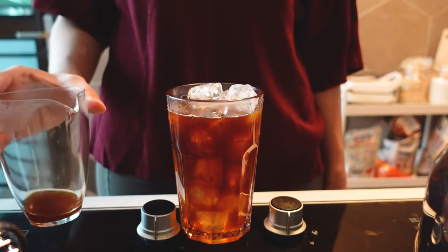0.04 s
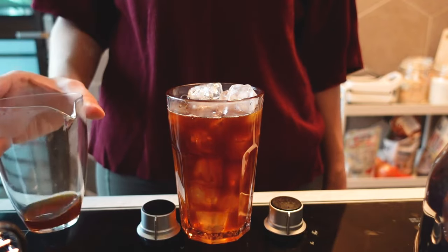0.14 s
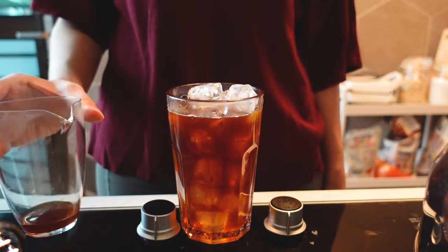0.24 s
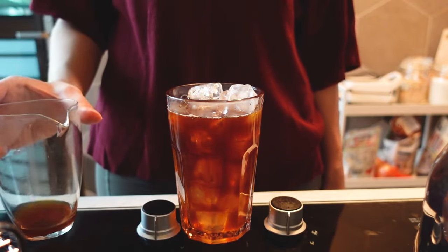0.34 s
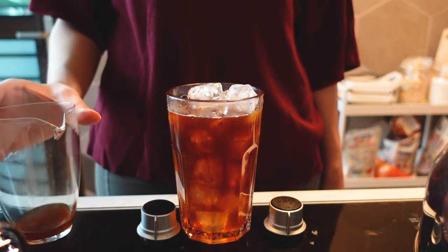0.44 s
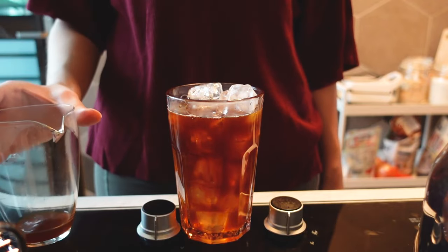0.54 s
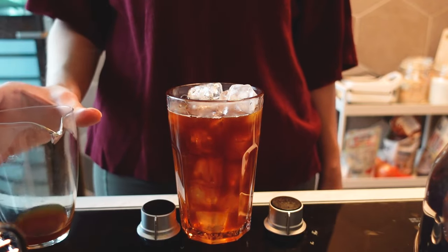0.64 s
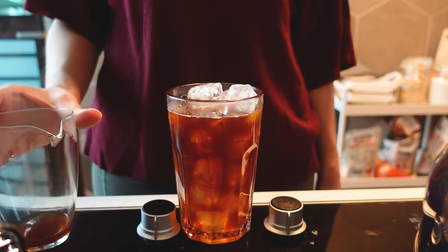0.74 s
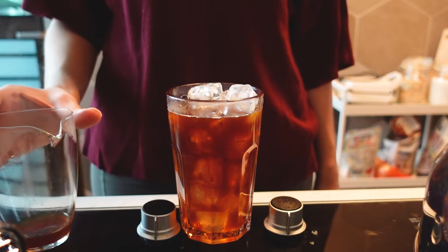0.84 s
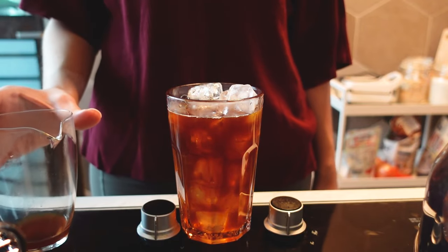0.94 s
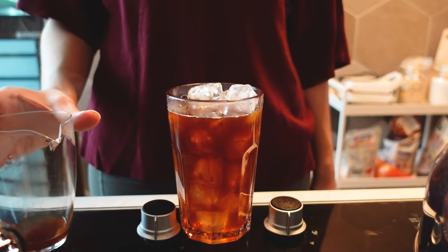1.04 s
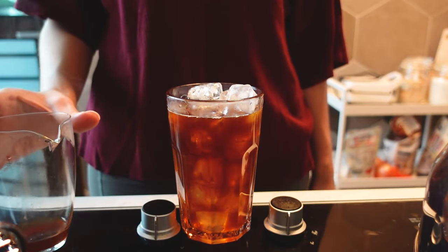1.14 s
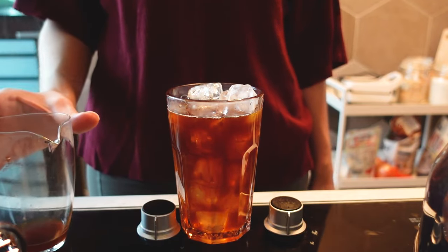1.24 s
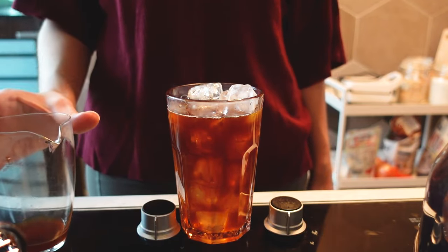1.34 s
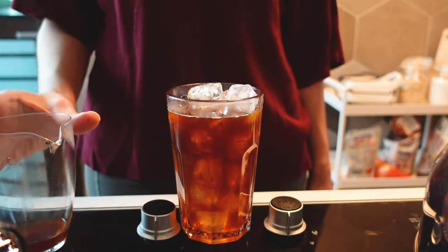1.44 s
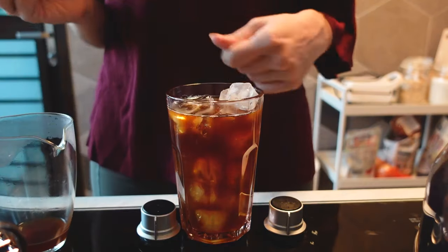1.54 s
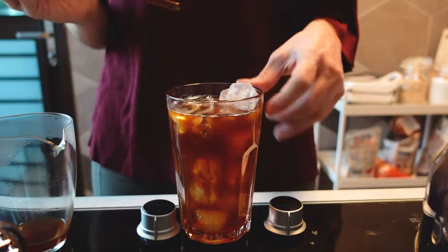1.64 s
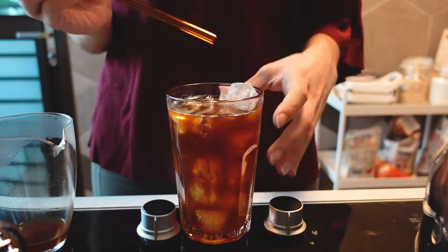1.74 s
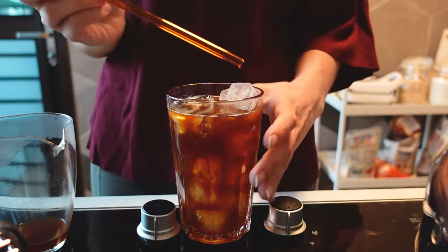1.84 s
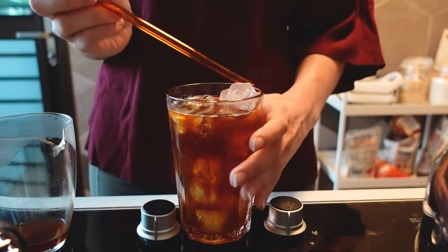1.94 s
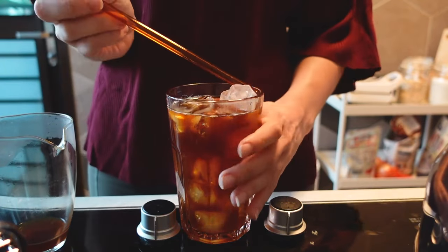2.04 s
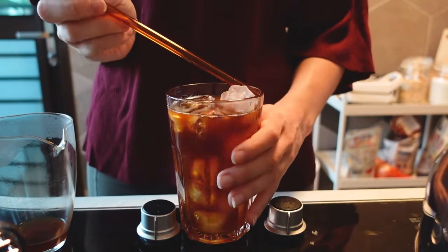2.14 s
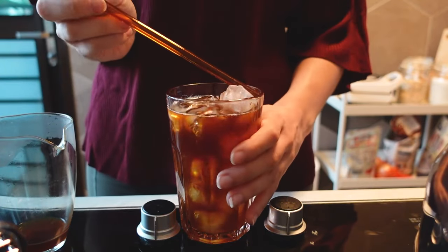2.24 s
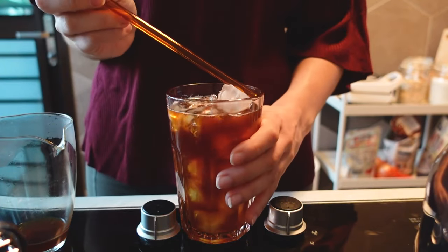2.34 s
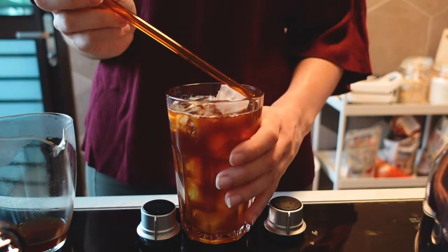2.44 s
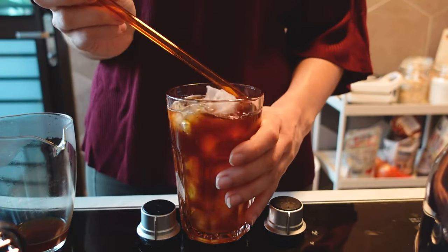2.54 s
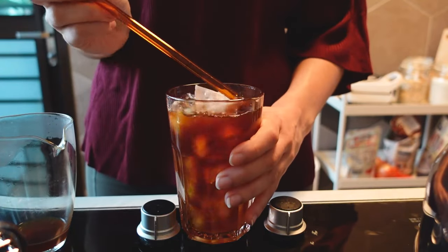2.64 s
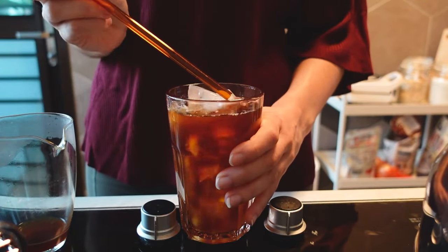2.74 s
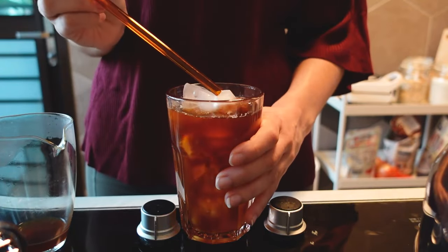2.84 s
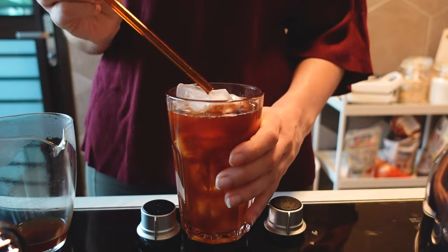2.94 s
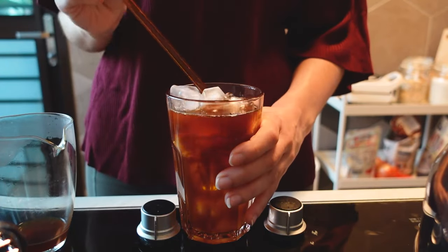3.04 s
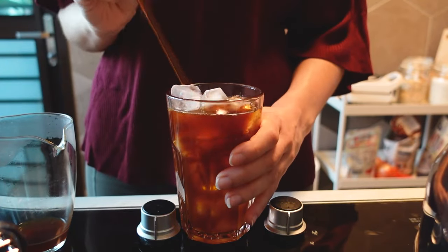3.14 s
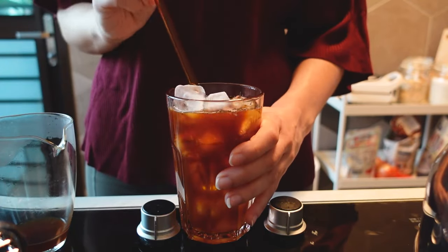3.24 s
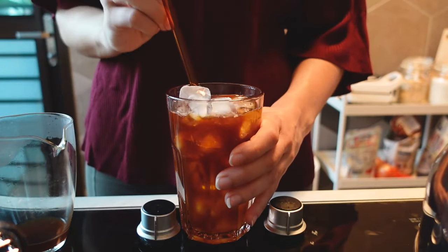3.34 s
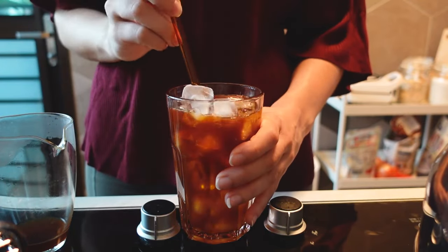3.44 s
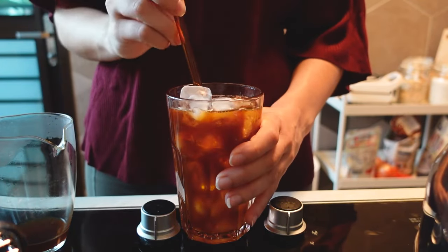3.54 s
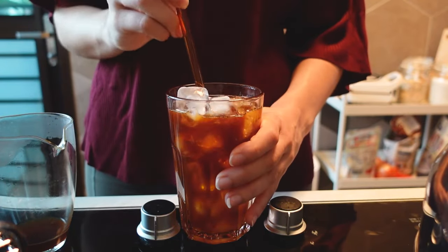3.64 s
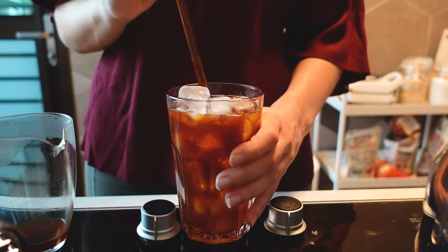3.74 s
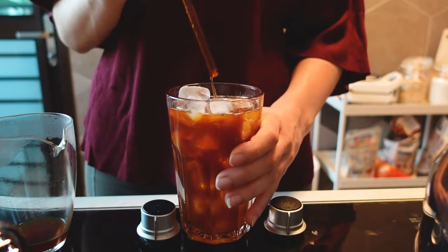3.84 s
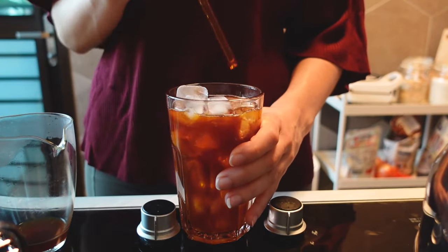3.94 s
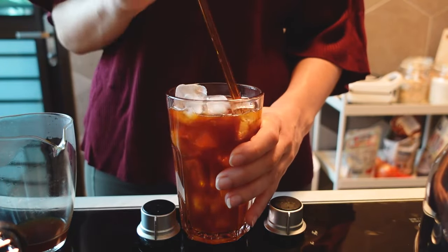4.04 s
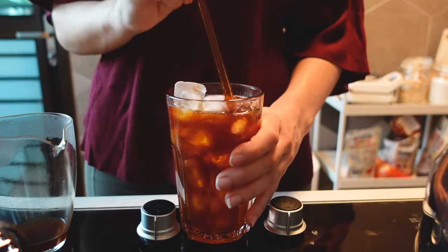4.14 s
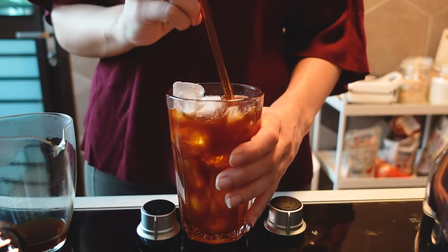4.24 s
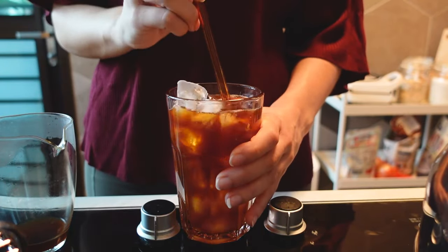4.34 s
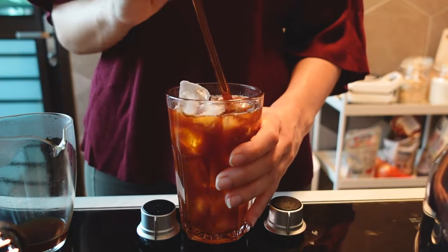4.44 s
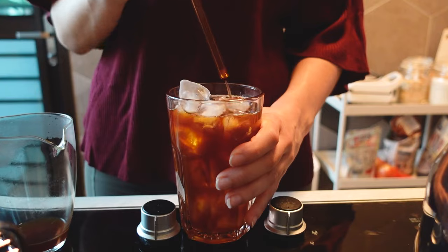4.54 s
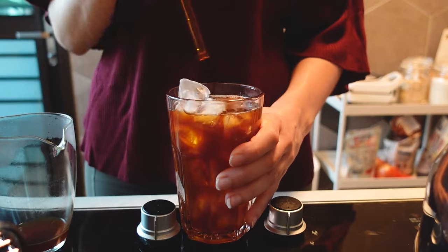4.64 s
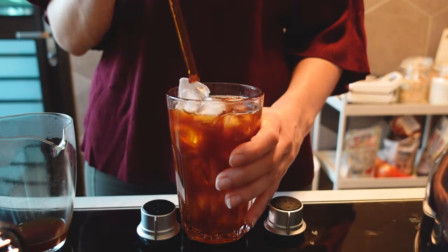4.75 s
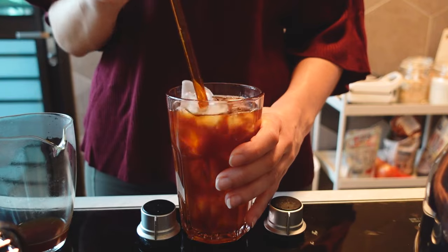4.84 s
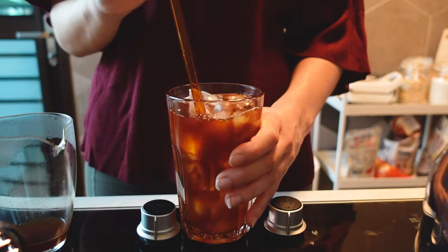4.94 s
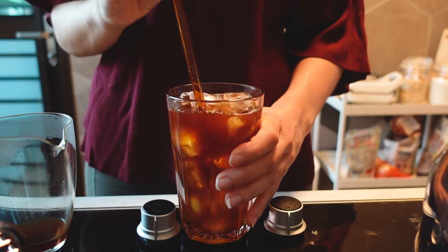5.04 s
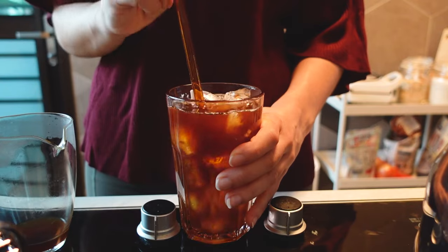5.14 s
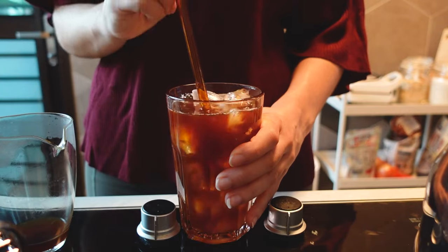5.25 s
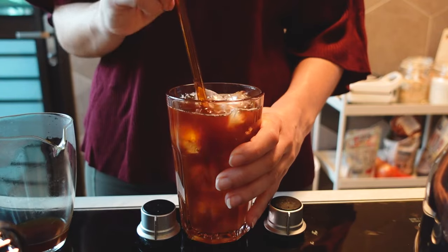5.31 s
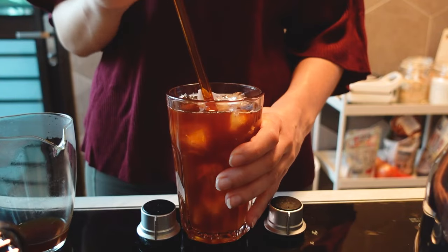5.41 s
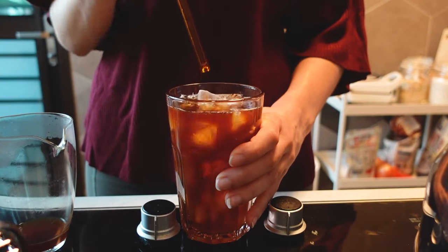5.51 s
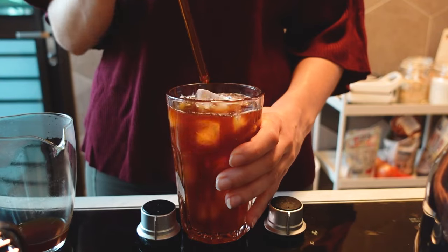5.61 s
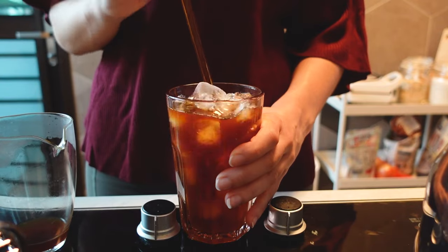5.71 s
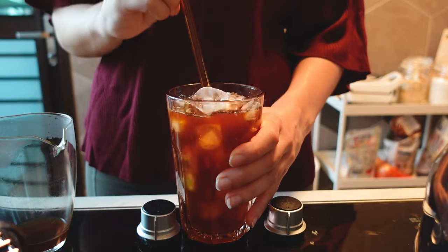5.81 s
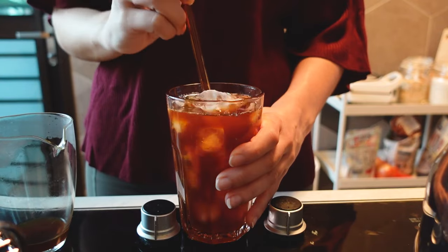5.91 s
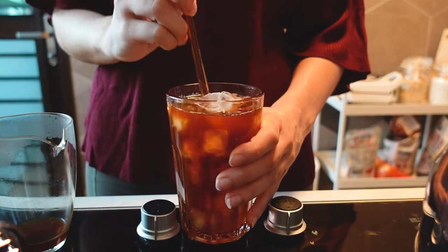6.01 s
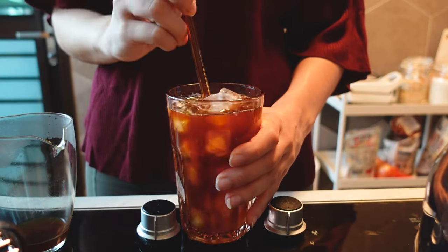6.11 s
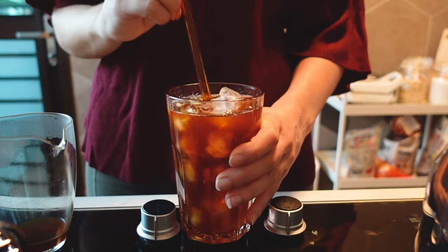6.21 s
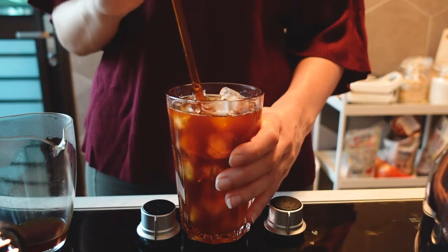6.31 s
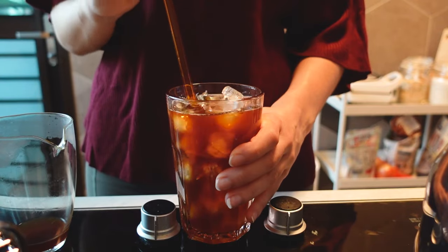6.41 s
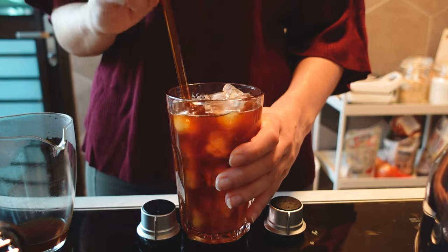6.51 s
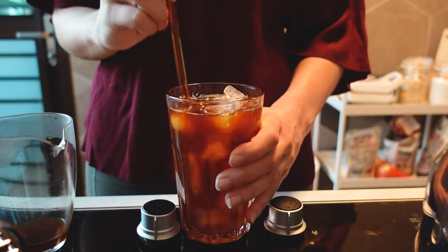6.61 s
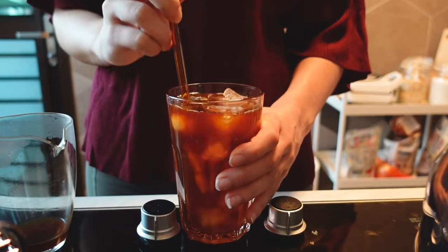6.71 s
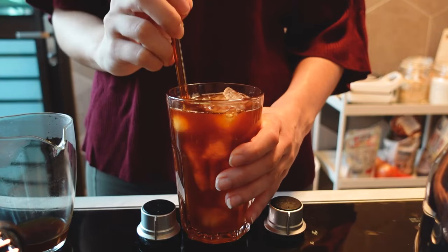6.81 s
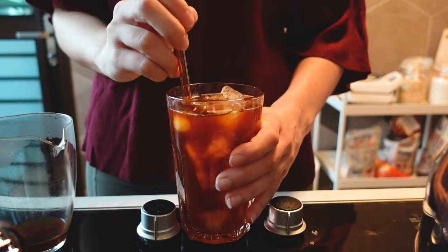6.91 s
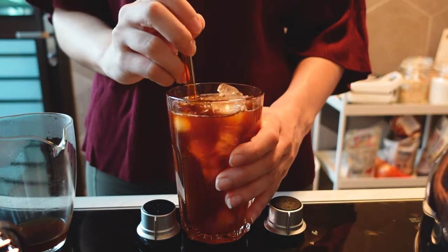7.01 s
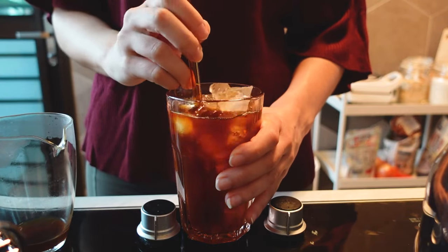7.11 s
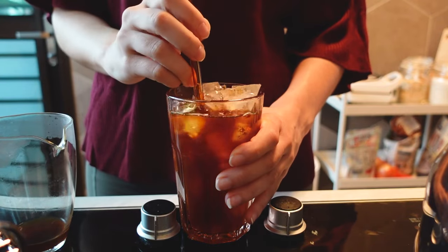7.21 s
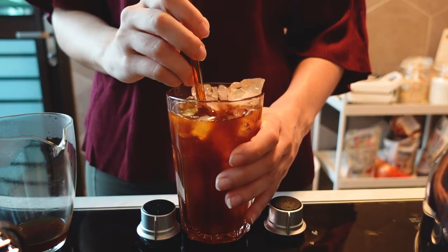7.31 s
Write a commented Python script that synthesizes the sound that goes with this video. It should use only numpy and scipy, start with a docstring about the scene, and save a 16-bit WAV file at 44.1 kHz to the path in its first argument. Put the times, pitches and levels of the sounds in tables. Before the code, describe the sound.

Ice cubes clink, bump and scrape in a tall glass as a straw stirs the drink, after a tumbler knocks on a kitchen counter.

```python
"""Faint swishes and soft bumps, then a tumbler is set down, close to the microphones in a small kitchen.
Then a glass straw stirs an iced drink stroke by stroke: ice cubes clink, grind and bump in a tall glass.
Bursts of noise ring the filled glass, random tiny slips make it grind and sing, and bending tones gulp.
Shaped noise crackles behind the knocks; the kitchen adds reflections over steady low hum and hiss."""
import sys
import numpy as np
from scipy import signal
from scipy.fft import rfft, irfft, next_fast_len
from scipy.io import wavfile

SR = 44100
rng = np.random.default_rng(int(sys.argv[2]) if len(sys.argv) > 2 else 0)


def unload_audio(sound):
    """Save the sound as a 16-bit wav file, at the path given as the first command line argument."""
    columns = np.transpose(np.atleast_2d(sound))
    # keep every value between -1 and 1, then stretch to whole-number steps
    steps = np.round(np.clip(columns, -1, 1) * 32767)
    wavfile.write(sys.argv[1], SR, steps.astype(np.int16))


N = 325017

# clear knocks of ice and straw on each other and the glass, as driven into the glass:
# [t/s, level/dB, ring f/Hz, thud re level/dB, crack re level/dB]; thud and crack before a common trim
CLINKS = [(2.0253, -33.5, 9020, -1.5, 7), (2.0272, -35.5, 5900, -12, -3), (2.107, -47.5, 3960, -4, -1),
          (2.1181, -47, 2410, -1, -4), (2.154, -47, 2360, 17.5, -10), (2.1934, -30.5, 3570, -31, -7.5),
          (2.3406, -47.5, 3940, -4, -12), (2.379, -41, 2000, -7, -31), (2.4082, -43, 2186, -0.5, -9),
          (2.4398, -45.5, 2420, 3, -18), (2.4867, -47, 3970, -5, -7.5), (2.585, -53, 3875, -8, -13),
          (2.6046, -51, 3860, -4, -13), (2.616, -34.5, 3700, -10, -3.5), (2.6402, -31.5, 3880, -8, -20),
          (2.6677, -38.5, 7000, -6, -6), (2.7045, -37, 7000, -7, -14), (2.7455, -42, 3700, -19, -0.5),
          (2.9978, -46, 4080, 5, -5), (3.154, -47.5, 5670, -2, 1.5), (3.173, -39.5, 3850, -2, -12),
          (3.1918, -38, 2900, -1.5, -22), (3.225, -40.5, 4950, 1, 3), (3.277, -39.5, 3780, -9, -36),
          (3.319, -33.5, 5500, -19, -34), (3.331, -43, 3854, -22, -13), (3.3506, -35, 3850, -21, -1.5),
          (3.369, -23.5, 2840, -1, -28), (3.398, -27, 3630, -2, -13), (3.4526, -35.5, 5980, 2.5, -18),
          (3.5018, -26.5, 1680, 1, -27), (3.577, -40.5, 2440, 10.5, -8.5), (3.705, -50, 4030, 10.5, -2.5),
          (3.808, -40, 3800, 0, 4), (3.8173, -31.5, 3870, -10, -20), (3.9117, -39.5, 2100, 6, -10),
          (4.03, -59, 3660, -8, -12), (4.1337, -28.5, 2500, -3, -27), (4.1391, -30, 3800, -9, -16),
          (4.169, -31, 4200, -18, -18), (4.1922, -23.5, 3850, -7.5, -8), (4.239, -32, 1620, -1, -14),
          (4.2543, -26, 3900, -6, -6.5), (4.2704, -31, 3830, -4, -9), (4.2871, -24, 2840, -3, -18),
          (4.2923, -31.5, 2800, 1, -6), (4.3219, -25, 4220, -4.5, -1), (4.3452, -28, 3800, -0.5, -8),
          (4.3632, -28, 3150, 0.5, -11), (4.38, -29.5, 3920, -6, -12), (4.391, -24, 2200, 1.5, -17),
          (4.454, -38, 2670, 2.5, -2.5), (4.4716, -24.5, 2650, -8.5, -37), (4.4959, -33.5, 2730, 3, -2.5),
          (4.539, -29.5, 2790, -13, -38), (4.779, -49.5, 1620, 3.5, -15), (4.8525, -31, 2670, -5, -12),
          (4.8628, -38.5, 2710, 1, -3), (4.901, -25, 2740, 1, -11), (4.9051, -30, 2710, 0, -6),
          (4.9148, -29.5, 3870, -3, -13), (4.996, -31.5, 4400, -7, -6), (5.0298, -33.5, 4070, -17, -2),
          (5.037, -36.5, 8120, -12, 5.5), (5.054, -31.5, 3800, -8, -8), (5.0952, -28, 2800, -5.5, -1.5),
          (5.1171, -40, 5500, 0, -2), (5.1485, -35.5, 5500, -2, -16), (5.1641, -35, 3850, -8, -12),
          (5.168, -45.5, 11500, -3, 5), (5.1852, -32.5, 3650, -5, -11), (5.212, -23.5, 2140, 0.5, -22),
          (5.2297, -33, 2210, 3, -14), (5.257, -23, 2710, -3.5, -22), (5.292, -38, 2800, -4, -18),
          (5.3095, -29, 2070, 6, -28), (5.3258, -25, 2000, -5, -28), (5.349, -31.5, 2840, -18, -21),
          (5.391, -35, 2790, -14, -13), (5.406, -38.5, 2734, -10, -8), (5.4471, -43.5, 3520, 0, -17),
          (5.5034, -36.5, 2000, -17, -22), (5.601, -47, 6250, -7, -12), (5.62, -50, 1480, -12, -20),
          (5.645, -46.5, 2130, -6, -18), (5.6629, -50, 3740, -5, -16), (5.7423, -28.5, 5600, -2.5, -7),
          (5.7539, -26, 3900, -1.5, -4), (5.769, -31, 2300, -15, -16), (5.7925, -24, 3670, -8, -6),
          (5.8114, -24.5, 3830, -3, -14), (5.8149, -25, 3160, -7, -14), (5.8191, -24.5, 3750, -11, 1.5),
          (5.8342, -21, 4020, -1, -20), (5.8408, -24.5, 3850, -6, -16), (5.8612, -19.5, 2140, -18, -16),
          (5.876, -27, 3780, -4.5, -0.5), (5.9321, -31, 3030, -7, -25), (5.9764, -29, 3250, 4.5, -27),
          (5.991, -33, 7860, 5, -5.5), (6.034, -29, 2300, -2, -16), (6.071, -36, 2520, -4, -23),
          (6.0875, -26, 2460, -10, -40), (6.1092, -40, 4500, -9, -21), (6.126, -37, 2433, -15, -25),
          (6.1636, -38.5, 2300, -2.5, -27), (6.2158, -29, 2263, -12.5, -39), (6.2323, -23, 2430, -16, -12),
          (6.33, -38, 3930, -13, -14), (6.3764, -39.5, 2110, -7, -23), (6.4213, -37.5, 5256, -13, -9),
          (6.4373, -34, 3900, -19, -12), (6.448, -27.5, 3870, -26, -24), (6.4666, -31, 3850, -25, -24),
          (6.5113, -27, 2400, 3.5, -3.5), (6.5284, -15, 2380, -7, -11), (6.5432, -24.5, 2330, -4, 0.5),
          (6.5779, -29.5, 8940, -1.5, 3), (6.597, -31.5, 2480, -9, -22), (6.647, -34, 3060, -24, -31),
          (6.672, -37.5, 8130, -5, 2.5), (6.6943, -34, 2400, -10, -11), (6.7183, -21, 2410, -2, -32),
          (6.7456, -25, 2400, -8.5, -33), (6.7882, -35, 5160, -4, -14), (6.8129, -36, 1507, 0, -10),
          (6.8252, -32.5, 2540, 4.5, 0.5), (6.85, -40, 1550, -5, -18), (6.8598, -30.5, 2520, -7, -22),
          (6.908, -54.5, 7900, -8, 7.5), (6.922, -40, 2500, -8, -19), (6.94, -36, 2600, -7, -20),
          (6.9451, -29.5, 2550, -8.5, -30), (6.957, -39.5, 5360, -10, -18),
          (7.0226, -33.5, 2530, -4.5, -29), (7.05, -41, 3080, -8, -20), (7.074, -43.5, 4700, -12, -16),
          (7.087, -36, 2520, -11, -20), (7.0957, -29.5, 4570, -14, -18), (7.1271, -36, 4260, -10, -16),
          (7.154, -36.5, 2490, -10, -25), (7.185, -42, 3780, -9, 1), (7.1981, -30.5, 2530, -14, -40),
          (7.2134, -30.5, 3310, -10, -41), (7.233, -38, 4500, -8, -22), (7.2513, -30.5, 2440, -29, -34),
          (7.295, -51, 7050, -15, 7), (7.3382, -39.5, 3220, -10, -17), (7.3678, -28.5, 3900, -24, -21)]
# pushes of the straw through the ice, before the trim of each layer:
# [start t/s, hold/s, effort level/dB, then re effort/dB: singing wall, scraping, churning]
STROKES = [(2.082, 0.16, -51, -8, -6, 9.5), (2.34, 0.3, -62.5, 4.5, -6, 11.5),
           (2.614, 0.051, -43, 10.5, 5, 11), (2.91, 0.19, -59, -2.5, -12, 10),
           (3.069, 0.39, -53.5, 3.5, 6.5, 0), (3.366, 0.054, -34.5, -9, -17, -0.5),
           (3.494, 0.098, -42.5, -9.5, -16, 4.5), (3.783, 0.16, -45.5, -8.5, -2.5, -2.5),
           (4.132, 0.0098, -32, -0.5, 3.5, 1), (4.259, 0.15, -31.5, -7.5, -10, -10),
           (4.47, 0.11, -46, -4, 8, -4), (4.896, 0.08, -34.5, -1.5, -4, -2.5),
           (5.016, 0.098, -33.5, 1.5, 6, -6.5), (5.207, 0.12, -34.5, -10.5, -8, -6.5),
           (5.437, 0.36, -53, -9, -7.5, -2), (5.74, 0.15, -36, 3, 7.5, 4),
           (5.967, 0.12, -31.5, -14, -4.5, -8.5), (6.221, 0.1, -42, -4.5, -2, -3),
           (6.427, 0.05, -36.5, -2, -12, -1.5), (6.507, 0.041, -27, -9, 0.5, -4.5),
           (6.652, 0.35, -42, -8, -1.5, -5), (7.057, 0.2, -42, -9, 3, -3),
           (7.296, 0.079, -46.5, 1, 0, -0.5)]
# modes of the filled glass, before the common mode level: [f/Hz, width/Hz, level/dB]
GLASS_MODES = [(282, 46, 1), (374, 28, -1.5), (554.4, 29, 5.5), (864, 32, 8), (1142, 69, 1),
               (1444, 116, 5.5), (1543, 32, 3), (1840, 11, 3), (2160, 26, -1), (2360, 135, -3.5),
               (3850, 56, -1.5), (5680, 820, -2.5), (6000, 1000, 1.5), (6560, 440, 8), (8180, 200, 2),
               (8850, 32, -5)]
# modes of the wall that rubbing keeps ringing, relative to each other: [f/Hz, width/Hz, level/dB]
WALL_MODES = [(1560, 84, -8), (2800, 400, -11), (3400, 300, -9), (3855, 85, 2.5), (4400, 500, -9),
              (7120, 350, -6)]
# colour of the wet grinding, as relative filter gain: [f/Hz, level/dB]
GRIND_COLOUR = [(900, 4), (1500, 7), (2400, 0.5), (3400, -7.5), (4800, -18), (9000, -60)]
# colour of the dry scraping, relative: [f/Hz, level/dB]
RASP_COLOUR = [(1200, -28), (2500, -6), (4200, 14.5), (5500, -3), (7000, -6), (8700, -4.5), (10500, -24.5),
               (13000, -20), (16000, -34)]
# colour of the churning drink, relative: [f/Hz, level/dB]
CHURN_COLOUR = [(60, -31.5), (130, -21.5), (280, -4.5), (450, -20.5), (850, -15.5), (1300, -69),
                (3000, -68)]
# cushioned low bumps of ice and hand against glass and counter, before trim and glass:
# [t/s, peak level/dB, f/Hz]
BUMPS = [(0.023, -45, 218), (0.422, -41.5, 190), (1.462, -42.5, 140), (1.654, -39, 564), (2.155, -28, 585),
         (2.166, -21.5, 350), (2.227, -28, 330), (2.44, -29.5, 298), (2.544, -37.5, 523), (2.667, -25, 284),
         (2.79, -34, 500), (3.007, -31.5, 290), (3.079, -34, 533), (3.105, -24.5, 282), (3.514, -18.5, 900),
         (3.518, -20.5, 380), (3.877, -36, 320), (4.928, -21.5, 710), (5.606, -45, 299),
         (5.643, -36.5, 746), (5.837, -31, 406), (6.672, -27.5, 540)]
# the drink plopping and gulping between the cubes, before the sag:
# [t/s, starting f/Hz, peak level/dB, length/s, bend over one length/octaves]
GULPS = [(1.581, 950, -45, 0.007, 0), (1.648, 850, -37, 0.005, -0.044), (1.655, 900, -32.5, 0.0066, 0.12),
         (1.793, 850, -35, 0.0063, 0.1), (2.154, 850, -34, 0.048, 0.085), (3.505, 1108, -29, 0.026, 0.12),
         (3.514, 610, -22.5, 0.015, -0.28), (3.533, 852, -24.5, 0.018, 0.11),
         (4.358, 697, -20.5, 0.01, -0.32), (4.367, 554, -20.5, 0.031, -0.04),
         (4.376, 802, -23, 0.021, 0.13), (4.395, 862, -15.5, 0.031, 0.047), (4.93, 685, -33, 0.051, 0.072),
         (5.259, 747, -13, 0.007, 0.03), (5.316, 600, -27, 0.01, 0.14), (5.866, 2130, -17, 0.015, 0.0044),
         (5.93, 1102, -30, 0.022, 0.029), (6.019, 1133, -28.5, 0.045, 0.035),
         (6.054, 2260, -36, 0.022, 0.032), (6.098, 2414, -31, 0.025, 0.04)]
# colour of the wet crackle behind the knocks, as relative filter gain: [f/Hz, level/dB]
SPLASH_COLOUR = [(1000, -27), (2800, -11), (4800, 16), (6500, -2), (9000, -11), (12000, -17), (16000, -33)]
# the straw tapping the rim: [t/s, lower mode level/dB, upper mode re lower/dB]
STRAW_TAPS = [(2.0255, -27, -8), (3.154, -41, 1), (4.852, -48, 8), (4.863, -48, 6), (4.9, -39, 0),
              (6.533, -9.5, -22), (6.559, -19, -12)]
# modes of the tumbler on the counter, relative to its overall level: [f/Hz, level/dB, t60/s]
TUMBLER_MODES = [(282, -11.5, 0.046), (403, -24, 0.049), (570, -16, 0.032), (835, 2, 0.03), (900, -5, 0.05),
                 (1025, -8.5, 0.041), (1225, -2, 0.021), (1600, 1.5, 0.011), (2300, 3.5, 0.01),
                 (2650, -5, 0.009), (3250, -8, 0.0076), (4380, -18, 0.01), (5150, -24, 0.01)]
# faint swishes before the stirring starts: [t/s, centre f/Hz, width/Hz, level/dB, length/s]
SWISHES = [(0.027, 7350, 600, -74, 0.18), (0.557, 2090, 900, -63.5, 0.051), (0.78, 5730, 706, -67, 0.04),
           (1.769, 4870, 1780, -61.5, 0.069)]
# decay of the kitchen: [f/Hz, t60/s]
KITCHEN_DECAY = [(150, 0.97), (400, 0.48), (1000, 0.45), (2800, 0.39), (7000, 0.34), (14000, 0.24)]
# colour of the room air, relative: [f/Hz, level/dB]
AIR_COLOUR = [(15, -96), (25, -89), (84, -15.5), (102, -14), (120, -11), (200, -13), (249, -15.5),
              (1070, -28.5), (1740, -28.5), (2050, -30.5), (4140, -40.5), (7310, -42), (8830, -46),
              (16000, -49.5)]

CHATTER_T60_S = 0.022
# lighter touches between the jostled cubes follow the effort of the strokes
JOSTLES_PER_S, JOSTLE_DB, JOSTLE_SPREAD_DB = 22, -5.5, 3.5
JOSTLE_LOW_HZ, JOSTLE_HIGH_HZ, JOSTLE_THUD_DB, JOSTLE_CRACK_DB = 2000, 5500, -3, -13
SETTLING_DB = -59.5  # between strokes the floating cubes still tick faintly, around this level
# the cubes give way at once, move unevenly while pushed, then coast to rest
STROKE_ATTACK_S, STROKE_COAST_T60_S, LURCH_DB, LURCHES_PER_S = 0.0033, 0.35, 3.5, 25
DRAG_SWING_DB = 2  # wet grinding and churning vary less than dry rubbing on the wall
# each glass mode is a pair, this share of its pitch either side of the centre, unevenly driven
MODE_SPLIT, MODE_SWING_DB = 0.008, 2
STRAW_HZ, STRAW_OVERTONE_HZ = 8800, 13350
TUMBLER_S, TUMBLER_DB = 1.2555, -19
AIR_DB = -56
HUM_HZ, HUM_DB, HUM_WIDTH_HZ = 119.3, -61.5, 13
CUTOFF_HZ = 16000


def clinks(snap=1.85, rise_s=0.000091, ring_width_hz=170, ring_db=12, overtone_db=9,
           thud_db=-2, clack_db=2.5, crack_db=-2, crack_top_hz=10200):
    """Each contact snaps, chatters for a few milliseconds and rings the piece that struck."""
    t = np.arange(SR // 12) / SR
    s, level_db, ring_hz, thud_rel_db, crack_rel_db = np.vstack([CLINKS, jostles()]).T
    chatter = rng.standard_normal((len(s), len(t)))
    force = chatter * fade(t, CHATTER_T60_S) * (1 - np.exp(-t / rise_s))
    force[:, 0] += snap
    # no two cubes have the same shape, so the second mode lies at a random ratio above the first
    second_hz = np.minimum(ring_hz * rng.uniform(1.3, 2.3, len(s)), 13000)
    rung = []
    for f, hz, upper_hz in zip(force, ring_hz, second_hz):
        ring = from_db(ring_db) * resonance(f, hz, ring_width_hz)
        overtone = from_db(overtone_db) * resonance(f, upper_hz, 2 * ring_width_hz)
        rung.append(f + ring + overtone)
    force = np.array(rung)
    # heavy contacts thud through the drink, hard dry ones crack
    parts = [(thuds(force), thud_rel_db + thud_db),
             (band(force, 1640, 3710), clack_db),
             (band(force, 6010, crack_top_hz), crack_rel_db + crack_db)]
    hits, out = 0, np.zeros(N)
    for part, part_db in parts:
        strength = np.sqrt(np.sum(part ** 2, axis=1) / (.006 * SR))  # energy spread over 6 ms
        hits = hits + part * (from_db(level_db + part_db) / strength)[:, None]
    for start, hit in zip(s, hits):
        add(out, start, hit)
    return out


def thuds(force, low_hz=260, high_hz=1300, width_hz=110, hollow_db=5):
    """Changing pockets of drink between the cubes give each thud a hollow pitch of its own."""
    pitches = low_hz * (high_hz / low_hz) ** rng.random(len(force))
    hollow = [f + from_db(hollow_db) * resonance(f, hz, width_hz) for f, hz in zip(force, pitches)]
    return band(np.array(hollow), 213, 1230)


def jostles(count=260):
    """Light contacts at uneven intervals from the first stroke on, as rows like those of CLINKS."""
    gap, pitch = rng.random((count, 2)).T
    size, thud, crack = JOSTLE_SPREAD_DB * rng.standard_normal((count, 3)).T
    s = STROKES[0][0] + np.cumsum(2 * gap / JOSTLES_PER_S)
    effort = np.interp(s * SR, np.arange(N), pushed(np.array(STROKES)[:, 2]))
    level_db = np.maximum(20 * np.log10(effort + 1e-9) + JOSTLE_DB, SETTLING_DB) + size
    ring_hz = JOSTLE_LOW_HZ * (JOSTLE_HIGH_HZ / JOSTLE_LOW_HZ) ** pitch
    rows = np.transpose([s, level_db, ring_hz, JOSTLE_THUD_DB + thud, JOSTLE_CRACK_DB + crack])
    return rows[s < N / SR]


def grinding(grind_db=-6.5, rasp_db=-9, churn_db=-5, sing_db=-6):
    """Wet ice sticks and slips along the wall and makes it sing while the drink churns underneath."""
    _, _, effort_db, wall_db, scrape_db, stir_db = np.transpose(STROKES)
    grind, churn = [pushed(effort_db + db) * lurching(DRAG_SWING_DB) for db in (0, stir_db)]
    press, scrape = [pushed(effort_db + db) * lurching(LURCH_DB) for db in (wall_db, scrape_db)]
    wet_ice = from_db(grind_db) * grind * coloured(crunch(), GRIND_COLOUR)
    dry_rasp = from_db(rasp_db) * scrape * coloured(slipping(), RASP_COLOUR)
    rub = grains(per_s=2500, spread_db=3)
    modes = [from_db(db) * rms_one(wall_mode(rub, hz, width)) for hz, width, db in WALL_MODES]
    singing = from_db(sing_db) * press * rms_one(sum(modes))
    water = coloured(grains(per_s=700, spread_db=3), CHURN_COLOUR)
    return wet_ice + dry_rasp + from_db(churn_db) * churn * water + singing


def crunch(slips_per_s=2000, damping=0.1, count=18):
    """Tiny slips, each ringing for a few cycles at one of a set of pitches dealt at random."""
    slips, dealt = grains(slips_per_s, spread_db=3.3), rng.integers(0, count, N)
    pitches = np.geomspace(1200, 11000, count)
    return sum(resonance(slips * (dealt == k), hz, damping * hz) for k, hz in enumerate(pitches))


def slipping(slips_per_s=130, slip_t60=0.011, spread_db=1.0):
    """Stick and slip: dry scratches of uneven size that die away quickly."""
    jolts = np.abs(grains(slips_per_s, spread_db))
    envelope = signal.lfilter([1], [1, -fade(1 / SR, slip_t60)], jolts + 1e-18)
    return envelope * rng.standard_normal(N)


def pushed(levels_db):
    """Gain over time of the strokes, each at its own level: attack, hold, coasting release."""
    t, power = np.arange(N) / SR, 0
    for db, (s, hold_s, *_) in zip(levels_db, STROKES):
        attack = np.clip((t - s) / STROKE_ATTACK_S, 0, 1)
        coast = fade(np.maximum(t - s - hold_s, 0), STROKE_COAST_T60_S)
        power = power + (from_db(db) * attack * coast) ** 2
    return np.sqrt(power)


def lurching(swing_db):
    """Random swings of gain as the cubes catch and come free."""
    return from_db(swing_db * wandering())


def wandering():
    """A new random value, of spread one, at every lurch; straight lines in between."""
    steps = rng.standard_normal(1000)
    return np.interp(np.arange(N) / SR * LURCHES_PER_S, np.arange(len(steps)), steps)


def glass(force, modes_db, direct_db=-1):
    """Every contact is heard directly and through the modes of the filled glass."""
    ringing = sum(from_db(db + modes_db) * wall_mode(force, hz, width) for hz, width, db in GLASS_MODES)
    return from_db(direct_db) * force + ringing


def wall_mode(force, hz, width_hz):
    """A glass mode is a close pair; a wandering point of contact shares the force between the two."""
    share = (1 + np.tanh(2 * wandering())) / 2
    driven = force * lurching(MODE_SWING_DB)
    lower = resonance(driven * share, hz * (1 - MODE_SPLIT), width_hz)
    upper = resonance(driven * (1 - share), hz * (1 + MODE_SPLIT), width_hz)
    return lower + upper


def bumps(push_t60=0.091, width_hz=170, gain_db=-1):
    """Cushioned contacts: a short rough push with a broad, low pitch."""
    t, out = np.arange(SR // 8) / SR, np.zeros(N)
    for s, peak_db, hz in BUMPS:
        push = rng.standard_normal(len(t)) * fade(t, push_t60)
        thump = band(resonance(push, hz, width_hz), .5 * hz, 2.55 * hz)
        add(out, s, from_db(peak_db + gain_db) * thump / np.abs(thump).max())
    return out


def gulps(swell_s=0.0014, sag_db=5, wobble=0.01):
    """Liquid squeezed through a gap sounds a hollow tone that bends, wobbles and sags until it closes."""
    t, out = np.arange(SR // 6) / SR, np.zeros(N)
    for s, hz, peak_db, length_s, bend_octaves in GULPS:
        flutter, waver = rms_one(band(rng.standard_normal((2, len(t))), 40, 150))
        age = np.minimum(t / length_s, 2)  # one at the closing
        pitch_hz = hz * 2 ** (bend_octaves * age) * (1 + wobble * waver)
        tone = np.sin(2 * np.pi * np.cumsum(pitch_hz) / SR)
        hold = (1 - np.exp(-t / swell_s)) * np.exp(-age ** 8) * (1 + .15 * flutter)
        add(out, s, from_db(peak_db - sag_db * age) * tone * hold)
    return out


def splashes(gain_db=-21, swell_s=0.0067, splash_t60=0.36, rel_crack=0.51):
    """Clear knocks shake the wet cubes: a bright crackle of droplets and chips dies away behind them."""
    t, power = np.arange(SR // 3) / SR, np.zeros(N)
    shape = (1 - np.exp(-t / swell_s)) * fade(t, splash_t60)
    for s, level_db, _, _, crack_db in CLINKS:
        add(power, s, (from_db(level_db + gain_db + rel_crack * crack_db) * shape) ** 2)
    return np.sqrt(power) * coloured(crunch(), SPLASH_COLOUR)


def straw(t60=0.02, swell_s=0.00038):
    """The glass straw pings briefly in two high modes."""
    t, out = np.arange(SR // 8) / SR, np.zeros(N)
    lower, upper = [np.sin(2 * np.pi * hz * t) for hz in (STRAW_HZ, STRAW_OVERTONE_HZ)]
    for s, peak_db, top_db in STRAW_TAPS:
        ping = lower + from_db(top_db) * upper
        add(out, s, from_db(peak_db) * ping * fade(t, t60) * (1 - np.exp(-t / swell_s)))
    return out


def tumbler(crack_db=-4, crack_t60=0.045, soft_hz=2700):
    """A thick base meets the counter: one short, damped knock whose treble falls away gently."""
    t, out = np.arange(SR // 4) / SR, np.zeros(N)
    knock = 0
    for k, (hz, db, t60) in enumerate(TUMBLER_MODES):
        knock = knock + (-1) ** k * from_db(db) * np.sin(2 * np.pi * hz * t) * fade(t, t60)
    soften = signal.butter(2, soft_hz, fs=SR, output="sos")
    contact = signal.sosfilt(soften, band(rng.standard_normal(len(t)), 500, 3500))
    crack = from_db(crack_db) * rms_one(contact) * fade(t, crack_t60)
    add(out, TUMBLER_S, from_db(TUMBLER_DB) * band(knock + crack, 150, 12000))
    return out


def swishes():
    """Soft puffs of narrow hiss that swell and fade."""
    t, out = np.arange(SR // 2) / SR, np.zeros(N)
    for s, hz, width_hz, level_db, length_s in SWISHES:
        low_hz, high_hz = max(hz - width_hz / 2, hz / 2), hz + width_hz / 2
        hiss = rms_one(band(rng.standard_normal(len(t)), low_hz, high_hz))
        age = 2 * t / length_s  # loudest at one, half the length
        add(out, s, from_db(level_db) * hiss * age * np.exp(1 - age))
    return out


def kitchen(x, wet_db, near_db, near_t60=0.026, width=0.41, build_s=0.0072, near_low_hz=1100):
    """Quick treble reflections off small things nearby, and a diffuse tail that dies sooner in the treble."""
    t, edges = np.arange(SR * 3 // 5) / SR, np.geomspace(80, 18000, 9)
    onset = 1 - np.exp(-(t / build_s) ** 2)
    tail = 0
    for low, high in zip(edges, edges[1:]):
        decay = fade(t, at_hz(KITCHEN_DECAY, np.sqrt(low * high)))
        tail = tail + band(rng.standard_normal((2, len(t))), low, high) * decay
    near = band(rng.standard_normal((2, len(t))), near_low_hz, edges[-1]) * fade(t, near_t60)
    echoes = from_db(wet_db) * rms_one(tail * onset) + from_db(near_db) * rms_one(near * onset)
    echoes = echoes / np.sqrt(len(t))
    mid, side = signal.fftconvolve(x[None], echoes, axes=1)[:, :N]
    return x + np.array([mid + width * side, mid - width * side])


def room_air(width=0.46):
    """Steady low hum and hiss of the room: coloured noise and one narrow resonance of noise."""
    mid, side = from_db(AIR_DB) * coloured(rng.standard_normal((2, N)), AIR_COLOUR)
    mid = mid + from_db(HUM_DB) * rms_one(resonance(rng.standard_normal(N), HUM_HZ, HUM_WIDTH_HZ))
    return np.array([mid + width * side, mid - width * side])


def grains(per_s, spread_db):
    """Random tiny contacts of uneven size and either sign."""
    sizes = from_db(spread_db * np.minimum(rng.exponential(1, N), 3.5))
    return (rng.random(N) < per_s / SR) * sizes * rng.choice([-1, 1], N)


def resonance(x, hz, width_hz):
    """Two-pole resonance with a gain of about one on top."""
    r = np.exp(-np.pi * width_hz / SR)
    feedback = [1, -2 * r * np.cos(2 * np.pi * hz / SR), r * r]
    return signal.lfilter(np.array([1, 0, -1]) * (1 - r * r) / 2, feedback, x + 1e-18)


def band(x, low_hz, high_hz):
    """Causal band-pass."""
    edges = [low_hz, min(high_hz, .45 * SR)]
    return signal.sosfilt(signal.butter(2, edges, "band", fs=SR, output="sos"), x)


def coloured(x, spectrum):
    """Filter a steady sound by a table of gains; rms one."""
    size = next_fast_len(N)
    gain = from_db(at_hz(spectrum, np.fft.rfftfreq(size, 1 / SR)))
    return rms_one(irfft(rfft(x, size) * gain, size)[..., :N])


def at_hz(points, hz):
    """Read a table on a log-frequency axis."""
    f, value = np.transpose(points)
    return np.interp(np.log(np.maximum(hz, 1)), np.log(f), value)


def fade(t, t60):
    """Exponential decay, 60 dB down at t60."""
    return np.exp(-np.log(1000) * t / t60)


def from_db(db):
    """Decibels to gain."""
    return 10 ** (np.asarray(db) / 20)


def rms_one(x):
    """Scale to an rms of one."""
    return x / np.sqrt(np.mean(x ** 2) + 1e-20)


def add(track, s, sound):
    """Mix a short sound into a track at time s."""
    i = int(np.clip(s * SR, 0, N - 1))
    track[i:i + len(sound)] += sound[:N - i]


def scene():
    """The tumbler and the stirred glass in the kitchen, over the room air."""
    # hard contacts ring the glass a little more than cushioned ones
    contacts = glass(clinks() + grinding(), modes_db=-3.0) + glass(bumps(), modes_db=-4)
    # so small a body radiates little deep bass
    highpass = signal.butter(1, 45, "high", fs=SR, output="sos")
    drink = signal.sosfilt(highpass, contacts + splashes() + gulps() + straw())
    stirred = kitchen(drink, wet_db=-11.5, near_db=-11.5)
    around = kitchen(tumbler() + swishes(), wet_db=-7, near_db=-12.0)
    return stirred + around + room_air()


def record(dry, bass_lean=0.13):
    """The left microphone hears the bass a little louder than the right; the top is cut."""
    bass = signal.sosfiltfilt(signal.butter(4, 950, fs=SR, output="sos"), dry)
    leaning = dry + bass_lean * bass * np.array([[1], [-1]])
    return signal.sosfilt(signal.ellip(10, .2, 80, CUTOFF_HZ, fs=SR, output="sos"), leaning)


dry = scene()
out = record(dry)
unload_audio(out)
```